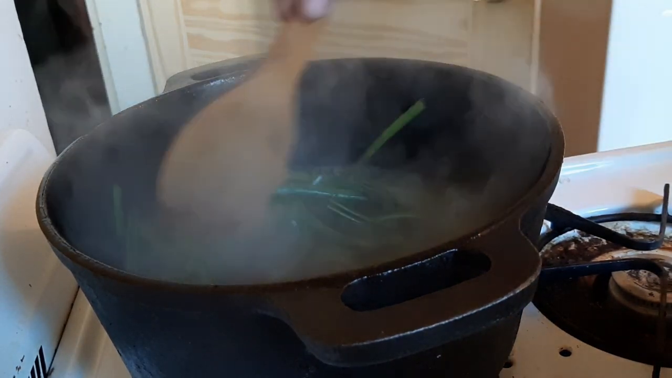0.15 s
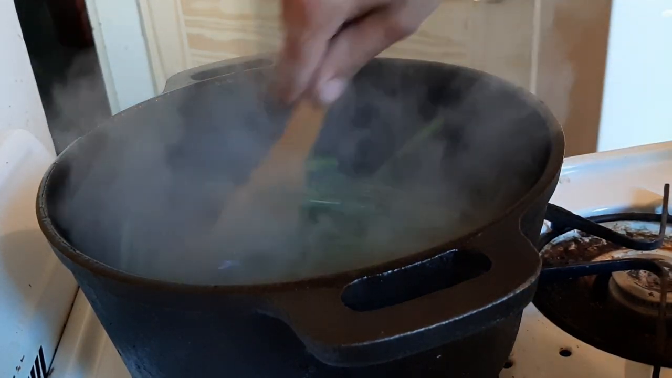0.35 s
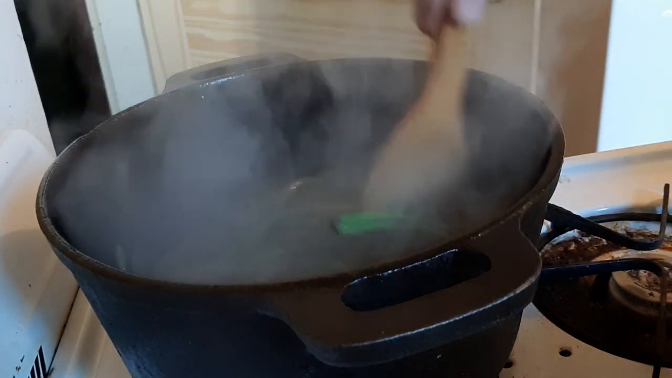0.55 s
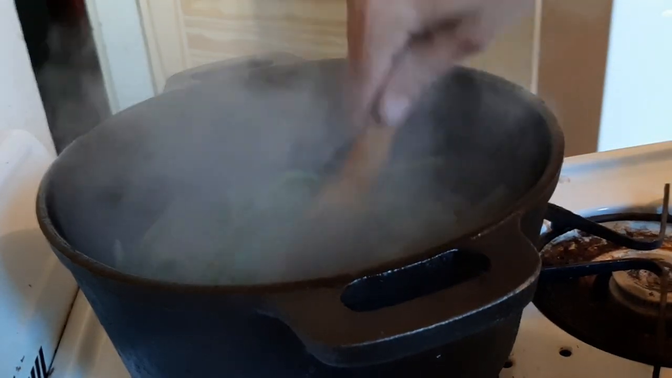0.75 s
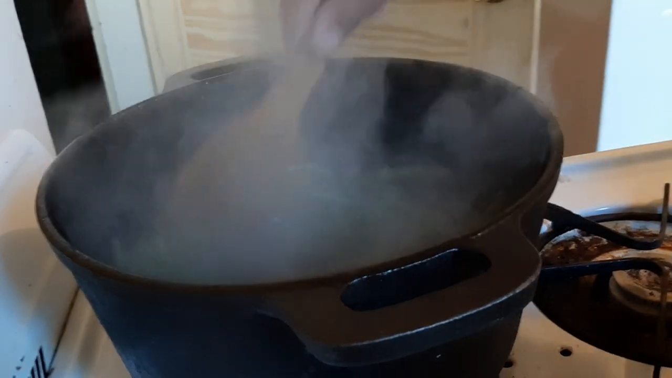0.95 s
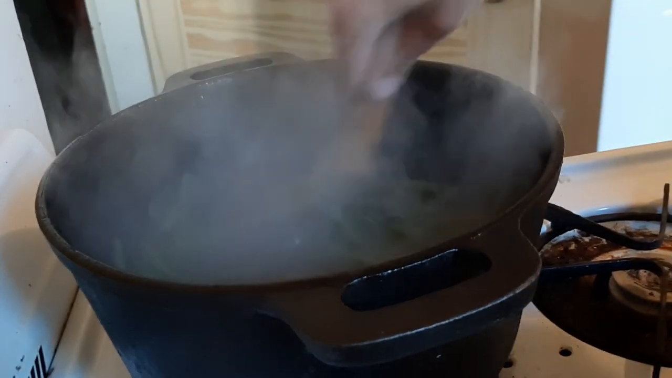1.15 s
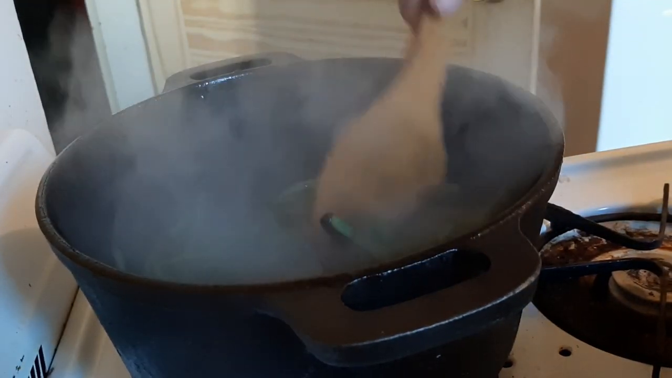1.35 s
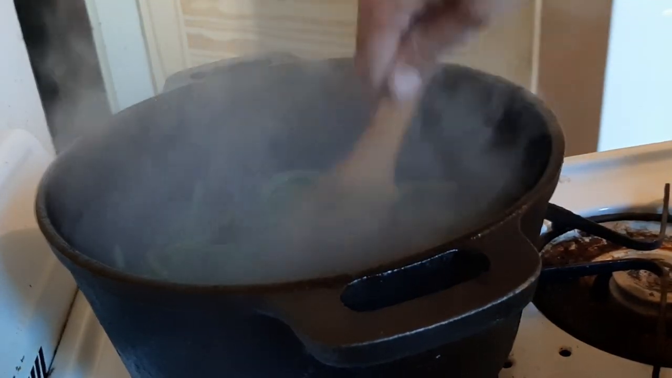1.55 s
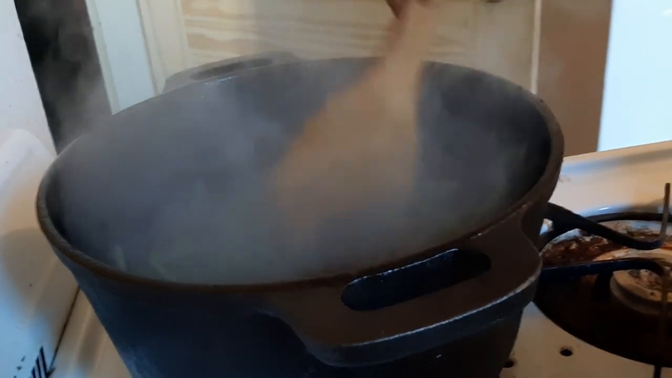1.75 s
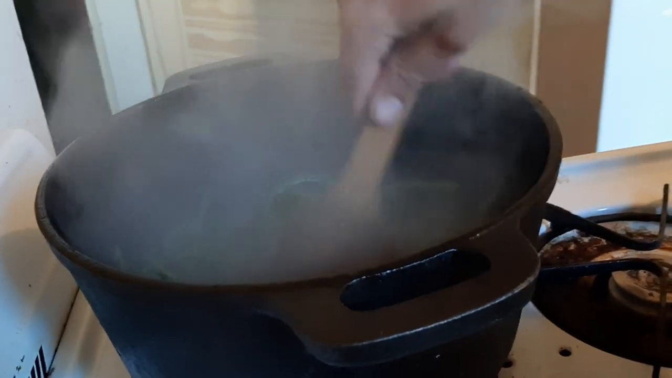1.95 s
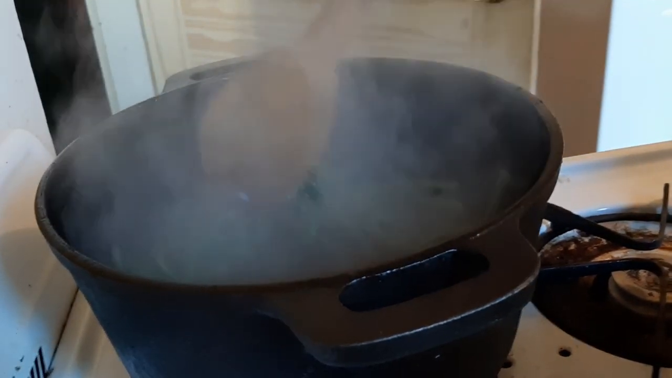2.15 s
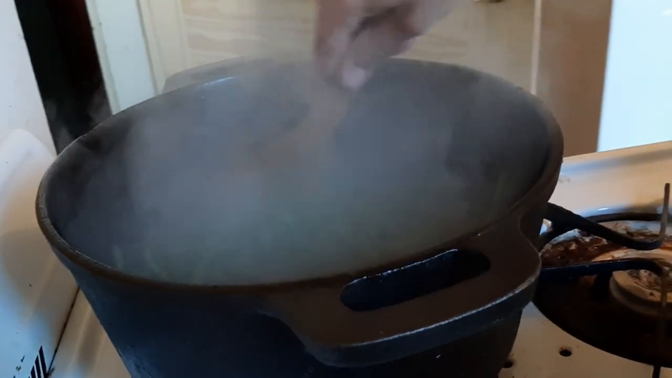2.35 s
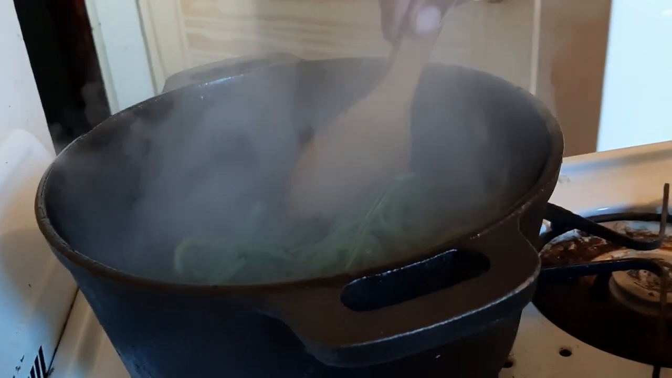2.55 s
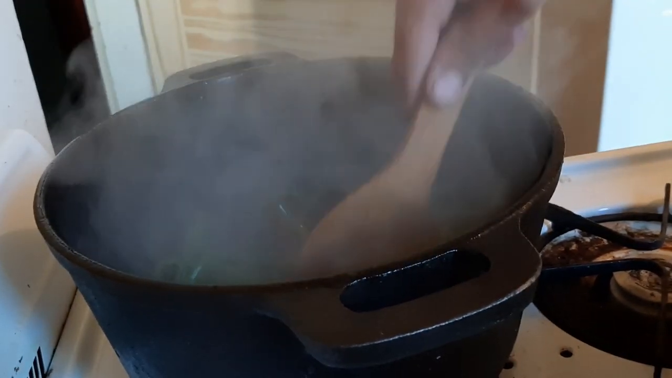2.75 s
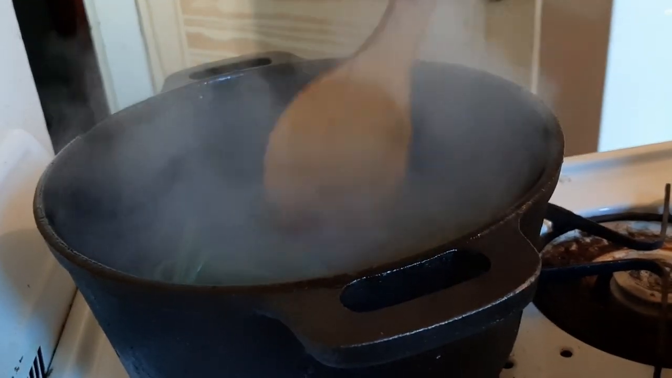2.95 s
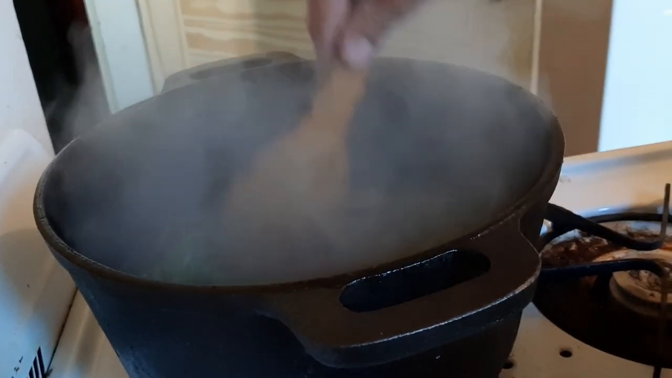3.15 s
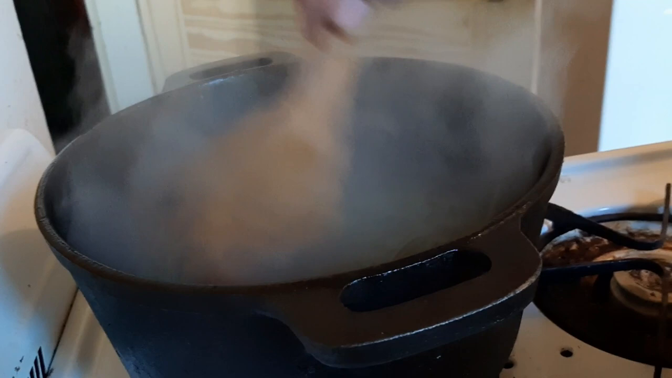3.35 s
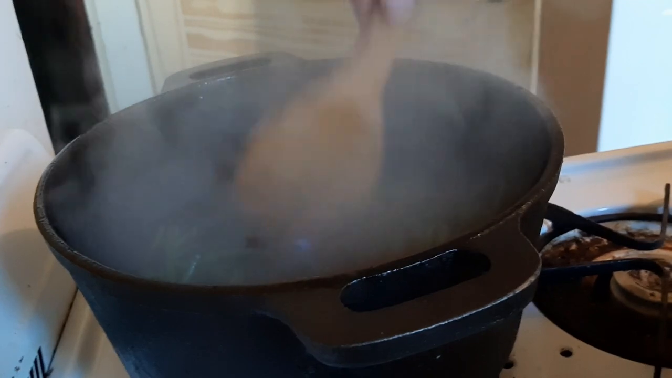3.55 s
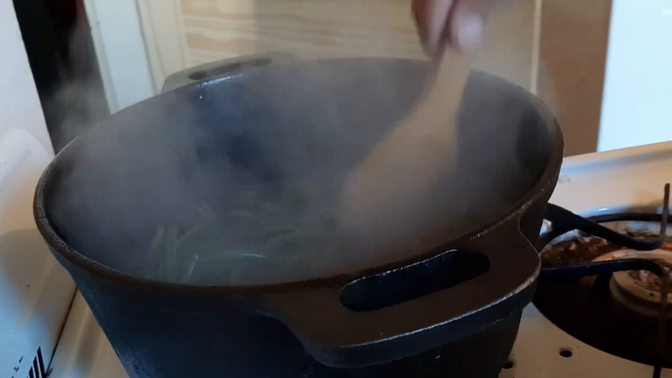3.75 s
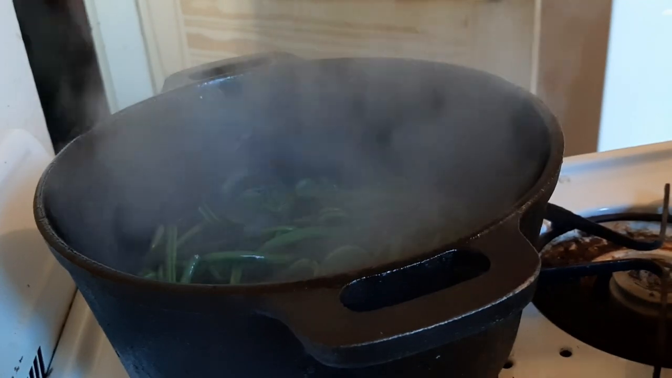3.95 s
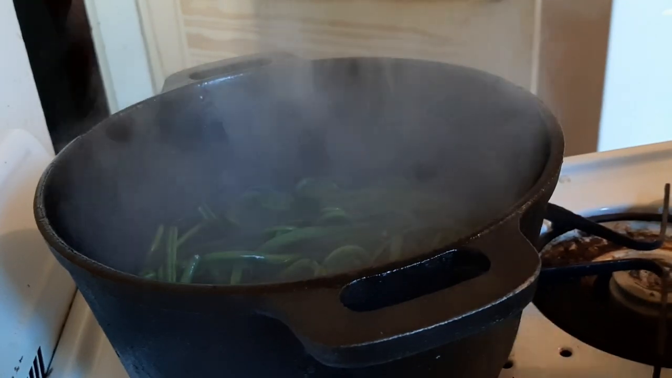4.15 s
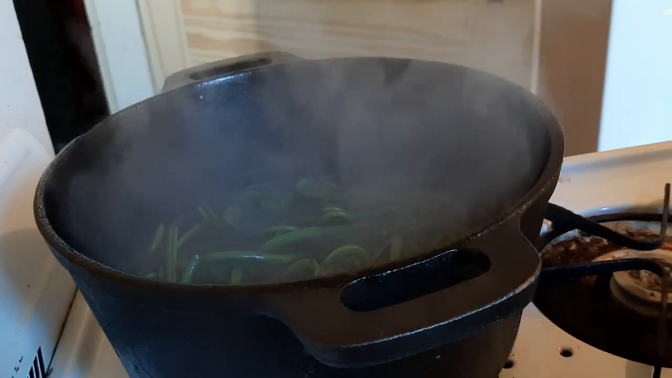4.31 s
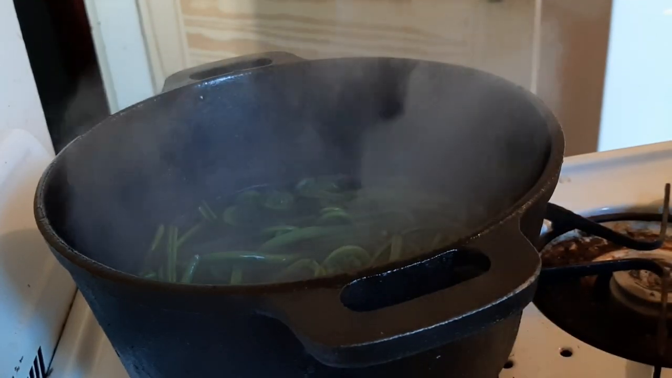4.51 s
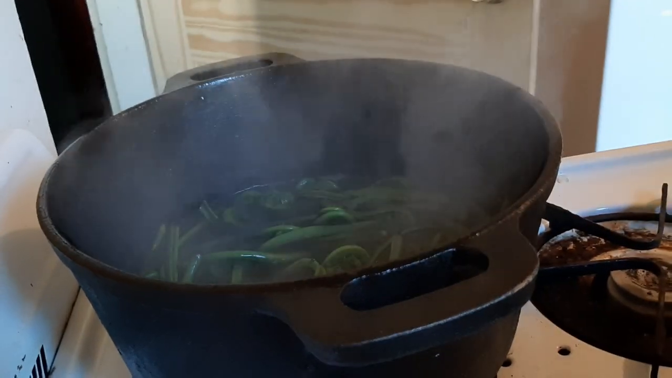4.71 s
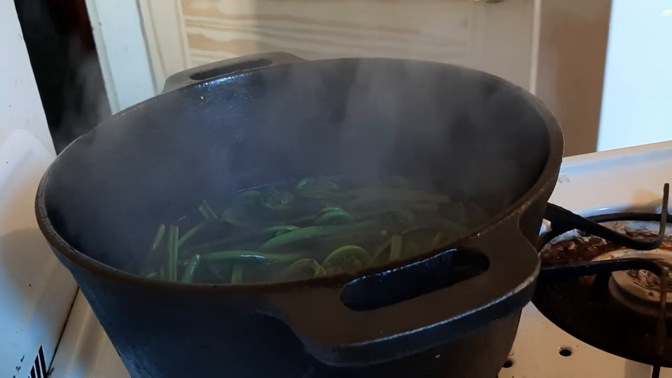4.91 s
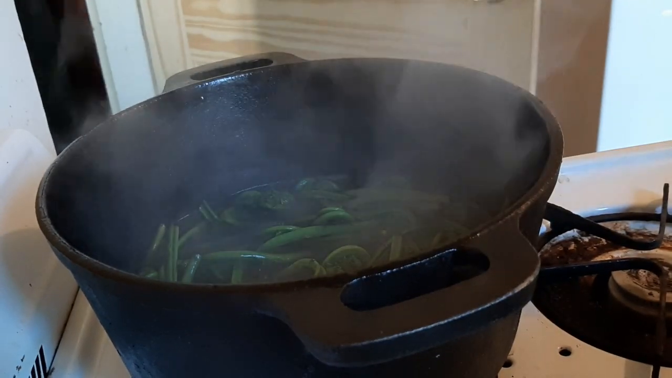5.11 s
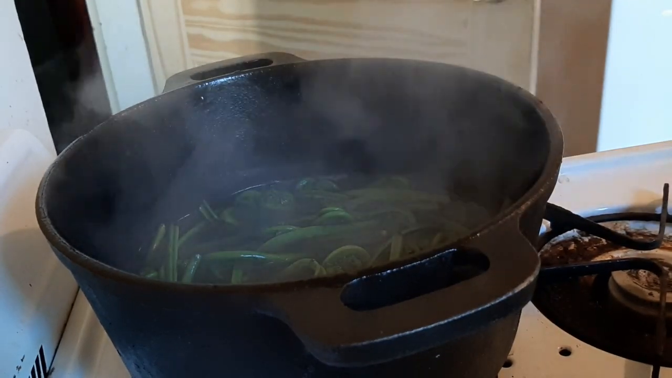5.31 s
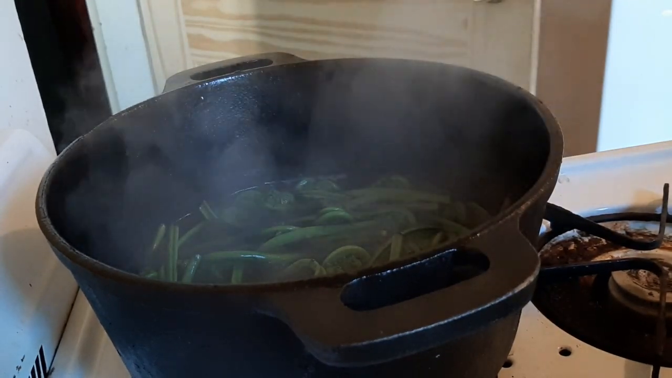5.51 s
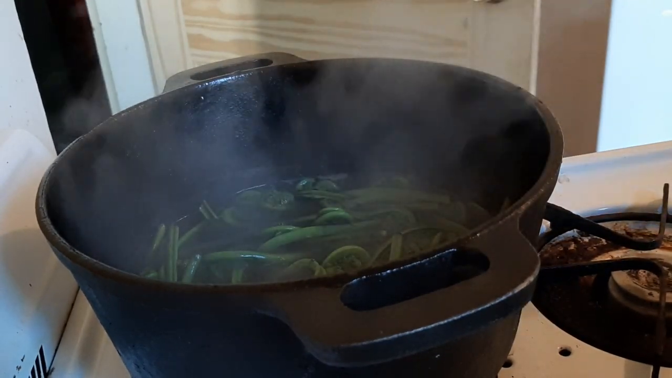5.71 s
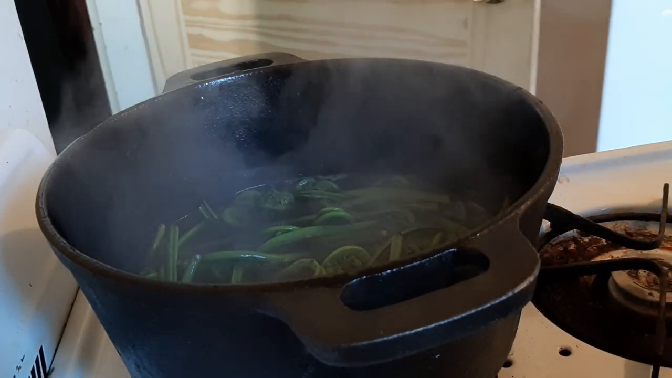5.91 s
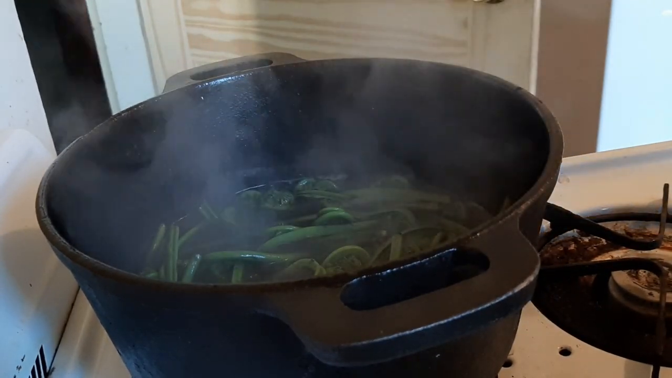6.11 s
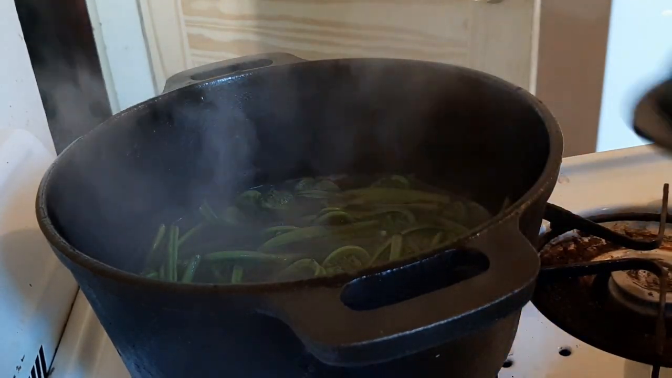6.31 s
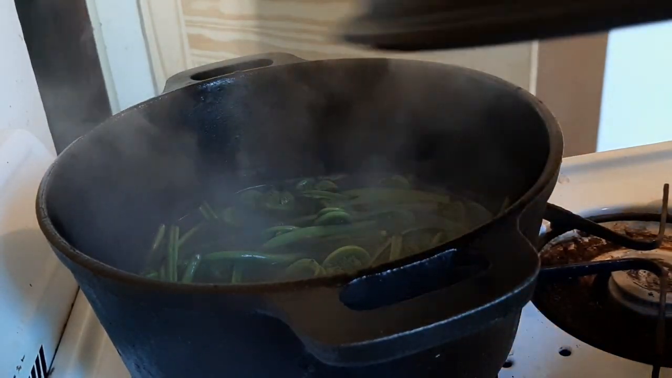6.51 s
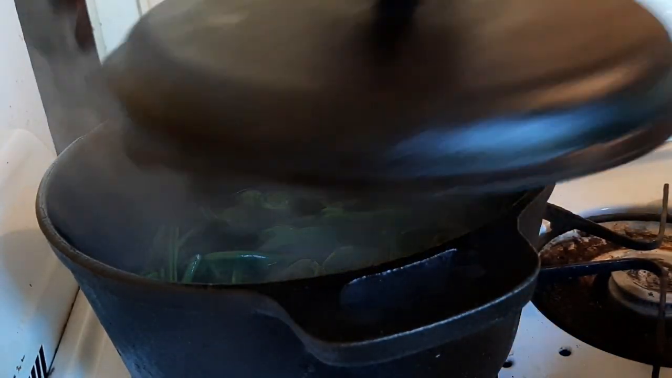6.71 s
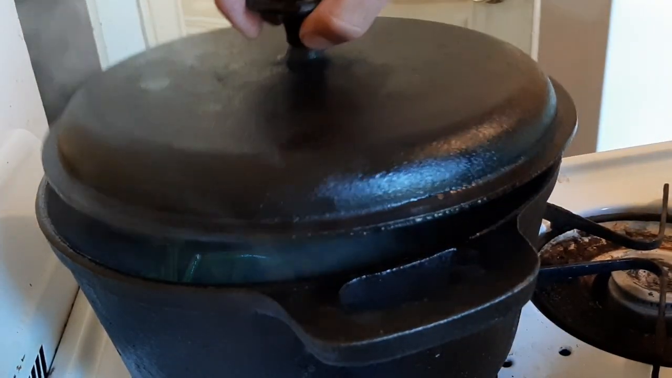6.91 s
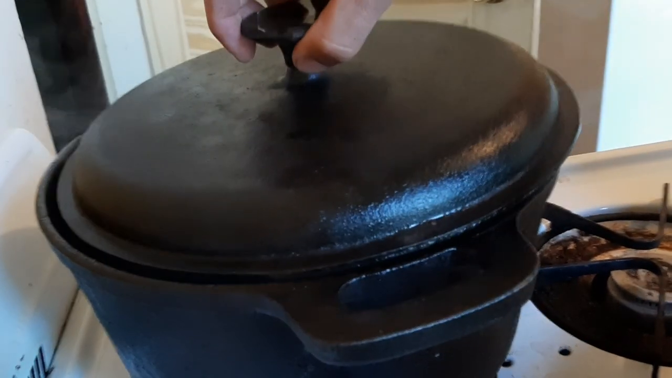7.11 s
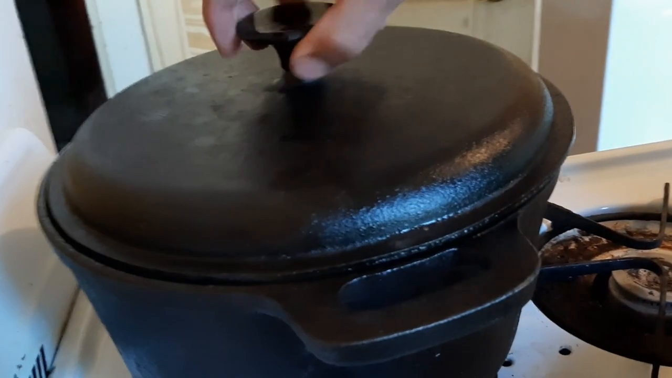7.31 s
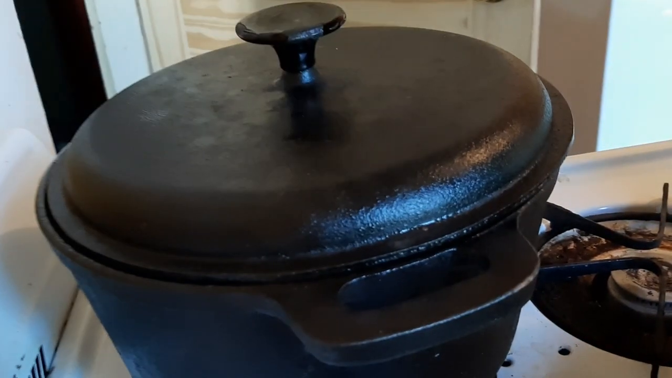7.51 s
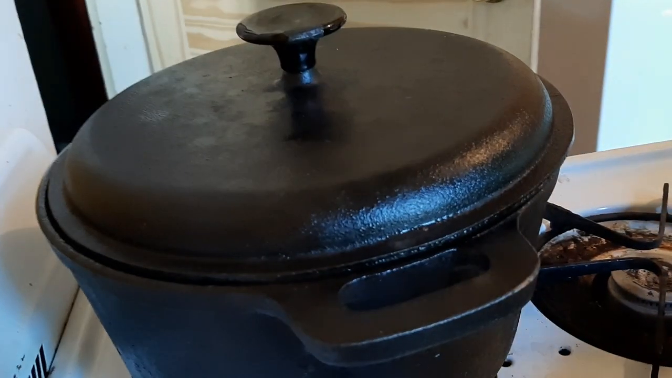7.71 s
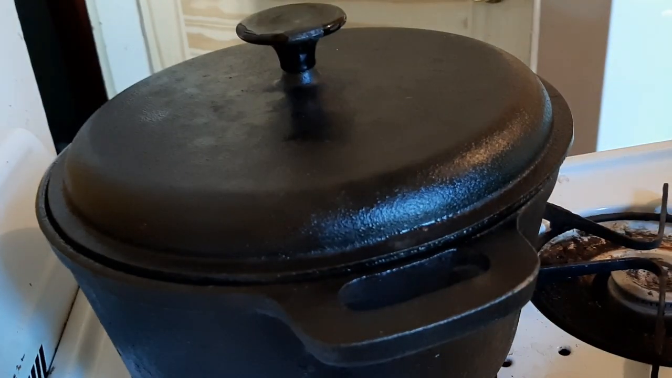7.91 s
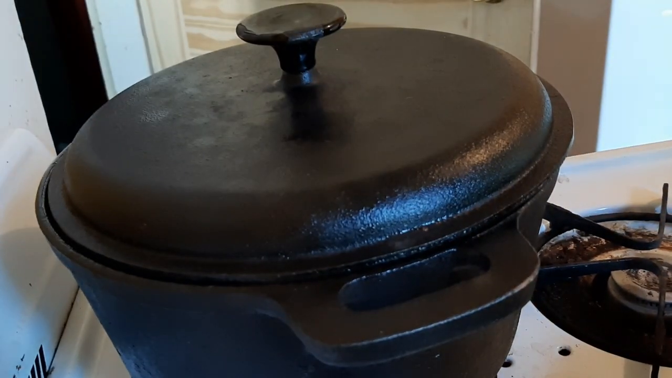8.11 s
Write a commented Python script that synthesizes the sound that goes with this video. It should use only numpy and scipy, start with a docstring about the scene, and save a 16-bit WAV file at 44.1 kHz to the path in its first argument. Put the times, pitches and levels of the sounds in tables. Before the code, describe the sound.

A wooden spatula stirs wet greens in a heavy iron pot with knocks and taps, then is set down, and an iron lid clanks shut.

```python
"""Wet greens rustle and crackle as a wooden spatula stirs them in a simmering iron pot, over a low steady hum.
The blade knocks, taps and squeaks on the wall, shoves jolt the pot, and the spatula is laid on the worktop.
Then an iron lid clanks on the rim, rocks and seats. Solids ring as sums of damped modes; friction, simmer and
room air are shaped noise. Sparse random echoes make a small hard kitchen, heard by two close microphones."""
import sys
import numpy as np
from scipy import signal
from scipy.fft import rfft, irfft
from scipy.io import wavfile
from scipy.ndimage import uniform_filter1d

SR = 44100
rng = np.random.default_rng(int(sys.argv[2]) if len(sys.argv) > 2 else 0)


def dump_mix(stems):
    """Bounce the given channels to the path in sys.argv[1] as a 16-bit WAV at rate SR."""
    frames = np.atleast_2d(stems).T  # one column per channel
    limited = np.clip(frames, -1, 1)  # hard clip at full scale
    pcm = np.round(limited * 32767).astype(np.int16)
    wavfile.write(sys.argv[1], SR, pcm)


def to_linear_factor(level_db):
    """Convert decibel levels (scalar or array-like) to linear amplitude factors."""
    exponent = np.asarray(level_db, float) / 20
    return 10 ** exponent


N = 359856  # samples

# Lid contacts with the rim. Each row: start in seconds, strength in dB, ringing in dB against the strength,
# brightness in dB per octave, side of the rim (1 near, -1 far).
CLANKS = [(6.939, -12.5, -19.5, -3.5, 0.99), (7.085, -1, -17.5, -2, -0.7),
          (7.117, -18.5, -28.5, -0.5, 0.36), (7.152, -1.5, -18.5, 0, -0.98),
          (7.189, -14, -18, -2.5, 0.0092), (7.212, -11, -21, -3, 0.007), (7.227, -8.5, -18, -3.5, -0.25),
          (7.266, -28.5, -15.5, -3, -0.63)]
SEATED_S = 7.285  # the lid rests on the rim from here on


def evened(x):
    """Normalises the signal power: rms 1."""
    return x / np.sqrt(np.mean(x ** 2) + 1e-20)


def peaked(x, db):
    """Normalises the largest excursion to a peak level in dB."""
    return to_linear_factor(db) * x / abs(x).max()


def read(points, hz):
    """Interpolates a spectrum linearly over log frequency, close to the scale of pitch."""
    f, value = np.transpose(points)
    return np.interp(np.log(hz + 1), np.log(f + 1), value)


def add(mix, s, sound):
    """Superposition: sounds sum linearly, this one from s seconds."""
    part = mix[..., round(s * SR):][..., :sound.shape[-1]]
    part += sound[..., :part.shape[-1]]


def coloured(x, points):
    """Linear filtering multiplies the spectrum by a gain curve, here with no phase shift."""
    gain = to_linear_factor(read(points, np.fft.rfftfreq(len(x), 1 / SR)))
    return evened(irfft(rfft(x) * gain, len(x)))


def struck(x, points):
    """Minimum-phase filtering is causal: nothing sounds before the blow."""
    hz = np.fft.rfftfreq(len(x), 1 / SR)
    cepstrum = irfft(np.log(to_linear_factor(read(points, hz))), len(x))
    cepstrum[1:len(x) // 2] *= 2
    cepstrum[len(x) // 2 + 1:] = 0
    gain = np.exp(rfft(cepstrum))
    return irfft(rfft(x) * gain, len(x)) / np.sqrt(np.mean(abs(gain) ** 2))


def resonate(x, hz, width):
    """A damped oscillator of gain 1: its bandwidth sets how fast it dies."""
    r = np.exp(-np.pi * width / SR)
    return 2 * signal.lfilter([1 - r], [1, -r * np.exp(2j * np.pi * hz / SR)], x).real


def humming(hz, width):
    """Noise driving one narrow resonance swells and sinks at random."""
    off = (np.fft.rfftfreq(N, 1 / SR) - hz) / (width / 2)
    return evened(irfft(rfft(rng.standard_normal(N)) / (1 + off ** 2), N))


def swells(rows):
    """Stroke envelopes summed in power. Rows: peak in seconds, dB, swell and fade in seconds."""
    span_db = 20  # rise over the swell time, fall over the fade time
    roundness = 1.5  # 1 = pointed peak, 2 = rounded
    t = np.arange(N) / SR
    power = 0
    for s, db, swell, fade in rows:
        away = np.maximum((s - t) / swell, (t - s) / fade)
        power = power + to_linear_factor(db - span_db * away ** roundness) ** 2
    return np.sqrt(power)


def pair(x, lead, pan_db):
    """Stereo by time and level difference: the right microphone hears it lead samples later."""
    delay = np.exp(-2j * np.pi * np.fft.rfftfreq(len(x)) * lead)
    late = irfft(rfft(x) * delay, len(x))
    return np.array([x * to_linear_factor(pan_db / 2), late * to_linear_factor(-pan_db / 2)])


def spatula():
    """Modal impact: a hard knock rings blade and wall together, with one sharp slap and a short chatter."""
    # Knocks on the rim. Each row: start in seconds, peak in dB, contact from 0 (struck flat) to 1 (on the edge),
    # slap in dB against the ring, left-right difference in dB.
    knocks = [(1.13, -6.5, 0.085, -11, -3), (2.315, -14.5, 0.96, -6.5, -4.5)]
    # Modes of blade and pot wall. Each row: frequency in Hz, width in Hz, dB struck flat, dB on the edge.
    wood = [(415, 157, -18.5, -9), (806, 41, -10.5, -31), (1366, 120, 1, -33.5), (1547, 94, 2, -16.5),
            (2120, 110, -4.5, 1), (2205, 110, -13, 1.5), (2320, 175, -5, 6.5), (2690, 140, -7.5, -10),
            (2940, 190, -14, -11), (3400, 200, -9, -9.5), (4050, 590, -21.5, 0.5), (5300, 500, -3.5, -21)]
    slap_flat_hz, slap_edge_hz = 1600, 1800  # centre of the slap
    out, t = np.zeros((2, N)), np.arange(8192) / SR
    hz, width, flat_db, edge_db = np.transpose(wood)[:, :, None]
    sign = (-1.) ** np.arange(len(wood))[:, None]  # neighbours in opposite phase
    modes = np.exp(-np.pi * width * t) * np.sin(2 * np.pi * hz * t) * sign
    for s, db, edge, slap_db, pan_db in knocks:
        ring = (to_linear_factor(flat_db + edge * (edge_db - flat_db)) * modes).sum(0)
        ring = peaked(ring, 0) * np.minimum(t / 0.00047, 1)
        chatter = 0.06 * rng.standard_normal(len(t)) * np.exp(-t / 0.012)
        top_hz = slap_flat_hz + edge * (slap_edge_hz - slap_flat_hz)
        slap_colour = [(150, -30.5), (1.3 * top_hz, -22), (top_hz, 2.5), (6000, -13.5), (16000, -40)]
        slap = struck(np.exp(-t / 0.00012) + chatter, slap_colour)
        add(out, s, pair(peaked(ring + peaked(slap, slap_db), db), 3.2, pan_db))
    return out


def taps():
    """Constant-Q decay: each tap rings for about as many cycles, started by a click of noise at its pitch."""
    # Light taps of the spatula and ticks of greens and drops.
    # Each row: start in seconds, peak in dB, pitch in Hz, left-right difference in dB.
    contacts = [(0.169, -43, 1360, -3), (0.357, -40, 4400, 3), (0.632, -51, 10500, -16),
                (0.98, -41.5, 5700, 4), (1.049, -42.5, 1600, -5), (1.051, -47, 5050, -7),
                (1.611, -45, 1740, -8), (1.612, -43, 2330, -7), (1.678, -44, 2300, -6),
                (1.679, -45, 1700, -8), (1.7245, -47, 5500, 1.5), (1.888, -45, 1600, -7),
                (1.989, -32, 1080, 0), (2.0295, -31.5, 2450, -1), (2.092, -35, 2000, -2.5),
                (2.261, -44.5, 1530, -7), (2.324, -35.5, 11500, -11), (2.373, -31.5, 8350, -6),
                (2.42, -45, 7100, 13), (2.772, -48, 1310, 3), (2.803, -47, 1240, 1),
                (2.801, -46.5, 3400, -12), (2.91, -44, 1070, -1), (3.1201, -32.5, 3380, -7.5),
                (3.147, -40, 2030, 2.5), (3.1577, -35, 4170, 6), (3.223, -40.5, 2010, -4),
                (3.2394, -44, 6500, -1.5), (3.29, -42.5, 3450, -6), (3.455, -32.5, 1690, -9),
                (3.457, -37.5, 1130, 2), (3.467, -45, 5500, 3), (3.509, -35.5, 3600, 8),
                (3.7338, -45, 3080, -11), (3.74, -41, 1080, 1), (3.7424, -39, 5100, 4),
                (7.839, -48.5, 10840, -9.5), (8.0704, -49.5, 11160, -12.5)]
    cycles, shortest_s = 34, 0.004  # both to -60 dB
    click_db, click_db_per_octave = -1.5, 3  # against the ring, at 1500 Hz: higher taps are more click
    out, t = np.zeros((2, N)), np.arange(4096) / SR
    for s, db, hz, pan_db in contacts:
        ring = to_linear_factor(-60 * t / max(cycles / hz, shortest_s)) * np.sin(2 * np.pi * hz * t)
        puff = coloured(rng.standard_normal(len(t)), [(hz / 6, -20), (hz, 0), (hz * 4, -28)])
        click = peaked(puff * np.exp(-t / 0.0019), click_db + click_db_per_octave * np.log2(hz / 1500))
        tap = (ring + click) * np.minimum(t / 0.00028, 1)
        add(out, s, pair(peaked(tap, db), 7.0, pan_db))
    return out


def greens():
    """Granular friction: a dense wet crackle of uneven grains over a smooth rustle."""
    # Swishes, mostly wet greens dragged by the blade. Each row: loudest moment in seconds, rustle in dB,
    # swell in seconds, fade in seconds, crackle in dB against the rustle.
    swishes = [(0.0, -57, .1, 0.11, -9.5), (0.268, -48.5, 0.066, 0.14, -8), (0.864, -65, 0.33, 0.039, -8.5),
               (1.185, -50, 0.045, 0.098, -11), (1.738, -71, 0.52, 0.043, -7.5),
               (2.08, -56, 0.14, 0.059, -4), (2.782, -63, 0.13, 0.09, -3), (3.13, -58.5, 0.081, 0.21, -1),
               (3.46, -54.5, 0.0074, 0.12, 1), (3.737, -53, .006, 0.055, -2), (4.109, -77, 0.2, 0.11, -10),
               (5.152, -61.5, 0.23, 0.12, -18), (7.844, -69, 0.052, 0.072, -11.5)]
    # Colour of the wet rubbing. Each row: frequency in Hz, relative density in dB per Hz.
    rustle_colour = [(290, -44), (500, 3.5), (1210, -5.5), (2260, -5.5), (6060, -5.5), (8700, -11),
                     (11100, -15), (16000, -29)]
    # a faint rustle under the swishes that settles
    stirring_db, stirring_ends_s, settle_db_per_s = -67.5, 1.4, 15
    settling_s = np.maximum(np.arange(N) / SR - stirring_ends_s, 0)
    smooth = to_linear_factor(stirring_db - settle_db_per_s * settling_s) + swells([row[:4] for row in swishes])
    gritty = swells([(s, db + crackle_db, swell, fade) for s, db, swell, fade, crackle_db in swishes])
    sizes = to_linear_factor(11.0 * np.minimum(rng.exponential(1, N), 4))
    grains = sizes * (rng.random(N) < 500 / SR)  # about 500 a second
    gate = signal.lfilter([1], [1, -.985], grains)  # each grain lasts a couple of ms
    rustle = coloured(rng.standard_normal(N), rustle_colour)
    crackle = coloured(gate * rng.standard_normal(N), rustle_colour)
    return pair(smooth * rustle + gritty * crackle, 3.76, -5.0)


def pot():
    """Forced vibration: a shove is a short uneven push, answered by the loaded pot's damped low modes."""
    # Soft shoves that jolt the pot on its burner.
    # Each row: start in seconds, peak in dB, length in seconds, brightness in dB per octave.
    shoves = [(0.21, -44, 0.045, -7), (0.772, -29, 0.027, -2.5), (0.806, -33, 0.024, -4),
              (0.862, -29.5, 0.017, -6), (1.5, -46, 0.055, -4.5), (1.564, -35, 0.058, -7.5),
              (1.607, -28.5, 0.026, -2), (1.676, -29.5, 0.02, -2), (1.973, -35.5, 0.035, 1.5),
              (2.361, -32.5, 0.017, -27), (2.445, -42.5, 0.035, -31), (7.165, -14.5, 0.0088, -3),
              (7.217, -29.5, 0.026, 12), (7.249, -28, 0.028, 3.5)]
    # Modes of the full pot. Each row: frequency in Hz, width in Hz, relative level in dB.
    modes = [(222, 45, 5), (392.7, 24, 7.5), (622.4, 56, 5.5), (822, 30, 3.5), (1080, 240, -3.5),
             (1530, 16, -4), (1690, 15, -7), (1995, 54, -10), (2390, 31, -6)]
    # Heavy strokes that set the stove top rumbling. Each row: peak in seconds, level in dB.
    heaves = [(0.06, -58), (0.228, -51), (0.81, -50), (1.14, -58), (1.51, -51), (2.0, -58.5)]
    heave_swell_s, heave_fade_s = 0.12, 0.66
    out, t = np.zeros(N), np.arange(8192) / SR
    for s, db, length, tilt_db in shoves:
        u = t / length
        push = rng.standard_normal(len(t)) * np.minimum(u * 6, 1) * np.exp(-u ** 2)
        ring = np.zeros(len(t))
        for hz, width, mode_db in modes:
            gain = to_linear_factor(mode_db + tilt_db * np.log2(hz / 400)) / np.sqrt(width)
            ring += gain * resonate(resonate(push, hz, width), hz, 6 * width)
        add(out, s, peaked(ring, db))
    strokes = swells([(s, db, heave_swell_s, heave_fade_s) for s, db in heaves])
    apart = np.array([humming(75, 60), humming(90, 60)])  # differs between the microphones
    return pair(out, 7.6, -1.5) + strokes * (humming(86, 91) + 0.23 * apart)


def squeak():
    """Rubbing tone of the blade on the wall: narrow-band noise under a soft window."""
    start_s, length_s, level_db, hz, width_hz = 0.708, 0.085, -61, 1530, 50
    out, window = np.zeros(N), signal.windows.tukey(round(length_s * SR), .5)
    add(out, start_s, to_linear_factor(level_db) * window * evened(humming(hz, width_hz)[:len(window)]))
    return pair(out, 6.0, -12.5)


def laid_down():
    """Impact on a damped plate: a flat slap, a dense clatter of blade and handle, a brief worktop knock."""
    # The spatula drops on the worktop. Each row: start in seconds, level in dB, left-right difference in dB.
    drops = [(5.3646, -15.5, -3)]
    # Worktop modes. Each row: frequency in Hz, level in dB against the slap, t60 in seconds.
    worktop = [(452, -10.5, 0.071), (825, -6, 0.054), (620, -21, 0.056)]
    # The slap of flat wood. Each row: frequency in Hz, relative density in dB per Hz.
    slap_colour = [(45, -58), (90, -6), (200, -9), (430, -0.5), (800, -7.5), (1200, -4), (2000, -1.5),
                   (3100, -14), (4000, -9.5), (7000, -16), (16000, -31)]
    out, t = np.zeros((2, N)), np.arange(8192) / SR
    rise = np.minimum(t / 0.00089, 1)
    knock = sum(to_linear_factor(db - 60 * t / t60) * np.sin(2 * np.pi * hz * t) for hz, db, t60 in worktop)
    for s, db, pan_db in drops:
        clatter = 0.53 * rng.standard_normal(len(t)) * np.exp(-t / 0.0099) * rise
        slap = struck(clatter + 1.8 * np.exp(-t / 0.00008), slap_colour)
        add(out, s, pair(to_linear_factor(db) * (slap + knock * rise), 13.0, pan_db))
    return out


def lid():
    """Modal plate with contact damping: each contact rings it and grips earlier rings; the rim damps it."""
    # Frequencies of the lid's modes in Hz.
    lid_hz = [224, 622, 816, 1018, 1211, 1410, 1529, 1733, 1870, 2075, 2430, 2591, 2756, 2895, 3300, 3736,
              4078, 4377, 4823, 5405, 6791, 6891, 3150, 5539, 6205, 7125, 7750, 8530, 9390, 10330, 10740,
              12010, 13000]
    # The same modes. Each row: relative level in dB, t60 in seconds held free, t60 in seconds once seated.
    lid_modes = [(-11, 0.34, 0.11), (-7.5, 0.092, 0.13), (-17.5, 0.2, 0.13), (-12.5, 2.2, 0.041),
                 (-15, 0.23, .2), (-9, 0.26, 0.15), (0.5, 0.077, 0.14), (-10, 1.9, 0.88), (-8, 0.82, 0.065),
                 (-10, 0.79, 0.33), (-9.5, 6, 0.66), (-13, 0.23, .22), (-7, 0.064, 0.18), (-7, 2.8, 0.14),
                 (-17, 0.16, .15), (-19.5, 0.57, 0.31), (-11.5, 0.35, 0.12), (-15.5, .4, .28),
                 (-18.5, 0.6, 0.34), (-6.5, 0.11, 0.12), (-16, 0.18, 0.15), (-10, 0.2, 0.18),
                 (-5, 0.068, .1), (-20.5, .23, .15), (-21, 0.27, .15), (-20, 0.37, 0.13), (-25.5, .3, .15),
                 (-13.5, 0.2, .15), (-24, .25, .15), (-21.5, 0.16, .15), (-27.5, .22, .15),
                 (-28.5, .18, .15), (-31.5, .2, .15)]
    # How much more each mode answers a contact on the near side of the rim, in dB.
    lean = [2, 4, 0.5, -4, 4, 2, 0, -2, 0.5, -4.5, -2, -7, -13.5, 1.5, -3.5, 5, 3, 0.5, -8.5, 4.5, 3, 9.5,
            -4, -2, 2.5, -2, 2.5, 5, 5, 7, 1.5, 4, 1]
    # Iron on iron between the modes. Each row: frequency in Hz, relative density in dB per Hz.
    thud_colour = [(53, -63), (90, -10.5), (368, -3.5), (520, -5), (800, -10.5), (1470, 5), (2270, -8),
                   (2830, -7), (3590, -12), (4860, -18.5), (5180, -29), (6500, -32), (13500, -48.5),
                   (16000, -78)]
    thud_tilt = 0.69  # how far the thud follows the brightness of a contact
    # A low tone near 370 Hz swells as the lid closes over the pot.
    # Each row: time in seconds, pitch in Hz, rms in dB.
    low_path = [(6.94, 385, -42.5), (6.956, 365.8, -43), (7.082, 367.7, -28.5), (7.184, 379.3, -25),
                (7.361, 360, -92)]
    rings, thuds, low = np.zeros((3, N))
    t = np.arange(SR * 4 // 5) / SR
    hz, lean_db = np.array([lid_hz, lean])[:, :, None]
    mode_db, free, seated = np.transpose(lid_modes)[:, :, None]
    contacts, rise = np.transpose(CLANKS)[0][:, None], np.minimum(t / 0.0011, 1)
    for s, db, ring_db, tilt_db, side in CLANKS:
        held = SEATED_S - s
        fade_db = -60 * (np.minimum(t, held) / free + np.maximum(t - held, 0) / seated)
        share_db = mode_db + tilt_db * np.log2(hz / 1500) + side * lean_db
        ring = (to_linear_factor(share_db + fade_db) * np.sin(2 * np.pi * hz * t)).sum(0)
        # later contacts so far, each taking 7.2 ms to grip
        grips = (np.clip((t + s - contacts) / 0.0072, 0, 1) * (contacts > s)).sum(0)
        add(rings, s, to_linear_factor(db + ring_db) * ring * to_linear_factor(-4.5 * grips) * rise)
        burst = rng.standard_normal(len(t)) * np.exp(-t / 0.0056) * rise
        tilted = [(f, d + thud_tilt * tilt_db * np.log2(f / 1500)) for f, d in thud_colour]
        add(thuds, s, peaked(struck(burst, tilted), db - 3.0))
    s, path_hz, path_db = np.transpose(low_path)
    when = np.arange(s[0], s[-1], 1 / SR)
    phase = 2 * np.pi * np.cumsum(np.interp(when, s, path_hz)) / SR
    level = np.sqrt(2) * to_linear_factor(np.interp(when, s, path_db))
    add(low, s[0], level * np.sin(phase) * signal.windows.tukey(len(when), .1))
    return pair(thuds, 8.8, -2.2), pair(rings, 2.9, -4.5), pair(low, 5.3, 0.79)


def kitchen(x):
    """Diffuse reverberation: three tails of sparse taps take turns so no two blows echo alike."""
    # Decay of the kitchen. Each row: frequency in Hz, t60 in seconds.
    room = [(200, 0.5), (530, 0.38), (1390, 0.35), (3680, 0.34), (9700, 0.21)]
    # First echoes off the nearest walls. Each row: delay in seconds, level in dB against the tail.
    early = [(.0085, -11.5), (0.0135, -16.5), (.025, -16.5)]
    turn_hz = 2.3
    impulses = np.zeros((3, 2, SR // 2))
    slots = np.arange(120, SR // 2 - 20, 20)  # one tap every 20 samples on average
    at = slots + rng.integers(0, 20, (3, 2, len(slots)))
    np.put_along_axis(impulses, at, rng.choice([-1., 1.], at.shape), 2)
    hz, t, z = signal.stft(impulses, SR, nperseg=256)
    same = 1 / (1 + (hz / 600) ** 2)[:, None]  # bass alike on both sides
    z[:, 1] = same * z[:, 0] + np.sqrt(1 - same ** 2) * z[:, 1]
    decay = to_linear_factor(-60 * t / read(room, hz)[:, None])  # each band dies at its own speed
    tails = signal.istft(z * decay, SR, nperseg=256)[1]
    tails /= np.linalg.norm(tails[:, :1], axis=2, keepdims=True)
    thirds = np.arange(3)[:, None, None] / 3
    turns = np.sqrt(2 / 3) * np.cos(2 * np.pi * (turn_hz * np.arange(N) / SR + thirds))
    out = signal.oaconvolve(turns * x, tails, axes=2).sum(0)[:, :N]
    for s, db in early:
        add(out, s, to_linear_factor(db) * x[::-1])  # they arrive from the other side
    return out


def background():
    """Partly coherent noise field: simmer and room air as random spectra, with resonances and the hum."""
    # Simmer and room air. Each row: frequency in Hz, relative density in dB per Hz.
    floor = [(15, -62), (28, -30), (55, -7), (97, -15), (114, -0.5), (134, -9.5), (157, -25.5), (185, -11),
             (335, -14), (451, -14.5), (560, -21.5), (1520, -26), (1790, -33), (5000, -31.5),
             (16000, -42.5)]
    # Left-right likeness of the noise. Each row: frequency in Hz, coherence from 0 to 1.
    likeness = [(40, 1), (180, 0.92), (550, 0.2), (1650, 0.15), (5000, 0.14), (15000, 0.13)]
    # Resonances in the background. Each row: frequency in Hz, width in Hz, level in dB.
    resonances = [(60, 13.2, -64.5), (183.6, 6.7, -65), (245, 95, -63), (1530, 140, -75)]
    air_db, hum_hz, hum_db, hum_blur_db = -56.5, 131.5, -54.5, -63.5
    frames, hz = N // 256 + 5, np.fft.rfftfreq(1024, 1 / SR)
    a, b, c, d, patches = rng.standard_normal((frames, 513, 5)).T
    patches = evened(uniform_filter1d(uniform_filter1d(patches, 14, 0), 10, 1))  # drift over pitch and time
    flicker = evened(uniform_filter1d(rng.standard_normal(frames), size=4))
    same, right = read(likeness, hz)[:, None], a + 1j * b
    ahead = right * np.exp(2j * np.pi * hz * 3.7 / SR)[:, None]  # the left side hears it 3.7 samples sooner
    z = np.array([same * ahead + np.sqrt(1 - same ** 2) * (c + 1j * d), to_linear_factor(2.0) * right])
    treble = (hz > 1500)[:, None]
    z *= to_linear_factor(read(floor, hz)[:, None] + 0.4 * patches + 0.36 * flicker * treble)
    covered = np.arange(frames) * 256 / SR > SEATED_S + 512 / SR
    muffled = np.clip(np.log2(hz / 250 + 0.011), 0, 1)[:, None]
    z *= to_linear_factor(-3.5 * covered * muffled)  # the lid muffles the simmer
    air = to_linear_factor(air_db) * evened(signal.istft(z, nperseg=1024, noverlap=768)[1][:, :N])
    body = sum(to_linear_factor(db) * humming(f, width) for f, width, db in resonances)
    hum = to_linear_factor(hum_db) * np.sqrt(2) * np.sin(2 * np.pi * hum_hz * np.arange(N) / SR)
    blur = to_linear_factor(hum_blur_db) * humming(hum_hz, 9.4)  # the hum wavers
    return air + pair(body + hum + blur, 7.38, 0.24)


def scene():
    """Direct sound, reverberation and background superpose; what happens deep in the pot echoes less."""
    thuds, rings, low = lid()
    inside = taps() + squeak() + pot() + greens()
    rim, worktop = spatula(), laid_down()
    since_s = np.maximum(np.arange(N) / SR - CLANKS[-2][0], 0)
    fresh = to_linear_factor(-120 * since_s)  # from the second-last contact on, the rings echo less and less
    sent = to_linear_factor(-6.5) * inside + to_linear_factor(-3.5) * rim + to_linear_factor(0.79) * worktop
    sent += to_linear_factor(-5.0) * thuds + to_linear_factor(-7.5) * rings * fresh
    return inside + rim + thuds + rings + worktop + kitchen(sent) + low + background()


def top_cut(x):
    """Nothing passes above the cut-off."""
    return signal.sosfilt(signal.butter(12, 15720, fs=SR, output="sos"), x)


def record(dry):
    """Frequency response of the microphones: a low cut, a treble notch and a lift above it."""
    # Each row: frequency in Hz, gain in dB.
    response = [(20, -9.5), (45, 0.5), (80, 0), (6500, 2.5), (8000, 0), (8700, -12), (9600, -2),
                (11000, 5.5)]
    gain = to_linear_factor(read(response, np.fft.rfftfreq(N, 1 / SR)))
    heard = irfft(rfft(dry) * gain, N)
    return top_cut(heard)


dry = scene()
out = record(dry)
dump_mix(out)
```